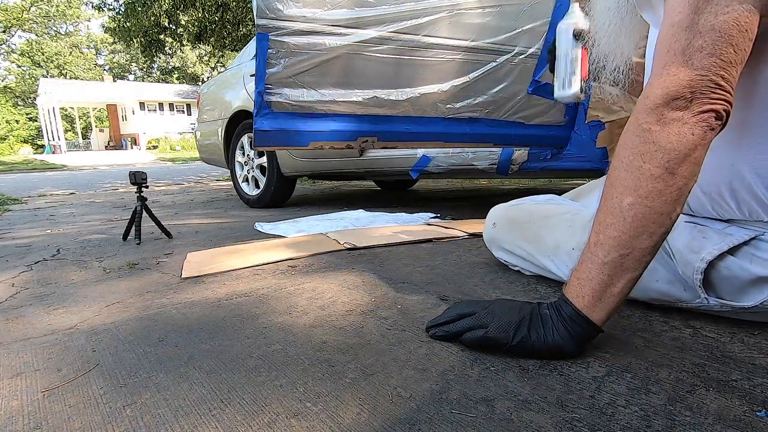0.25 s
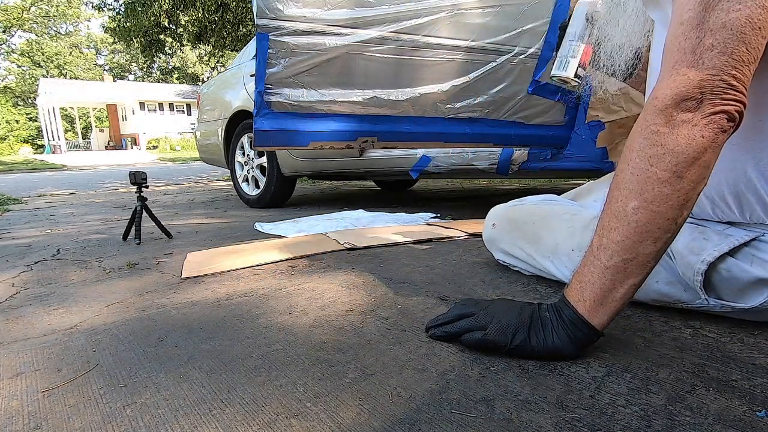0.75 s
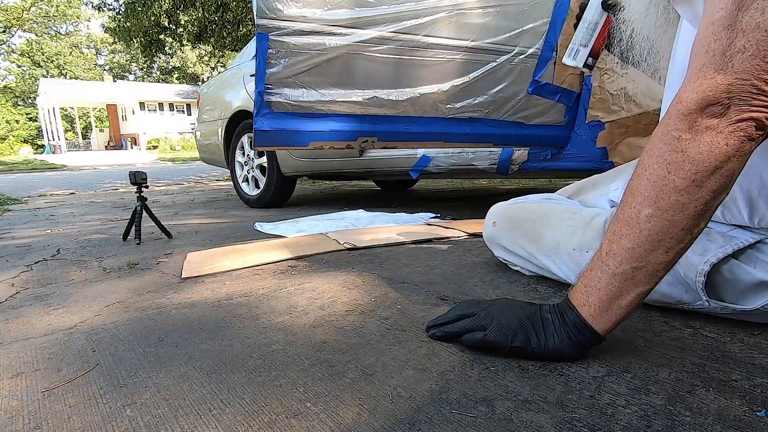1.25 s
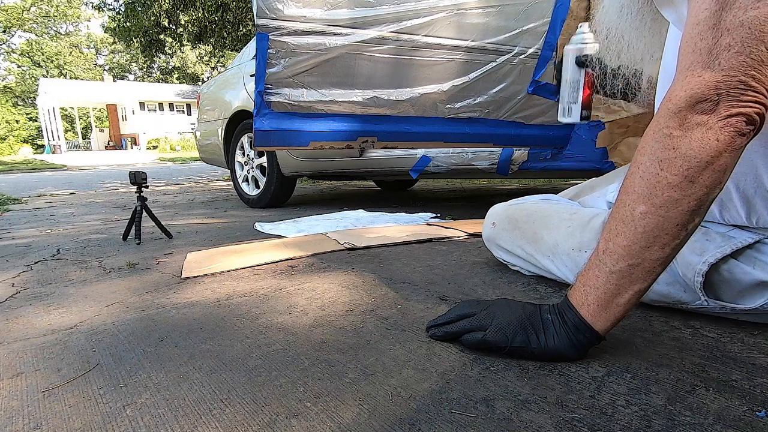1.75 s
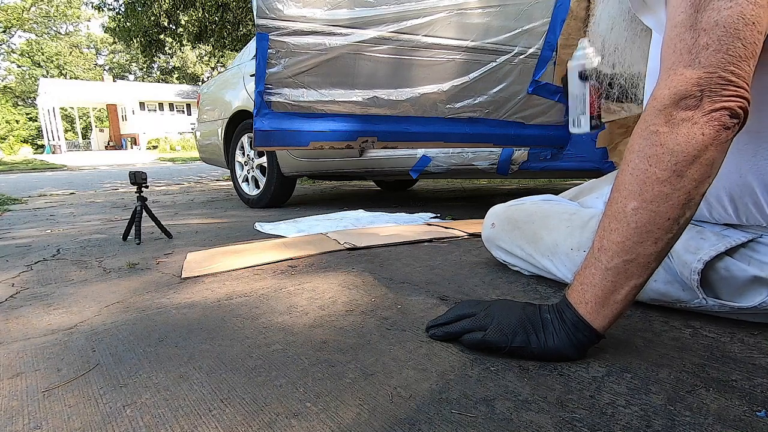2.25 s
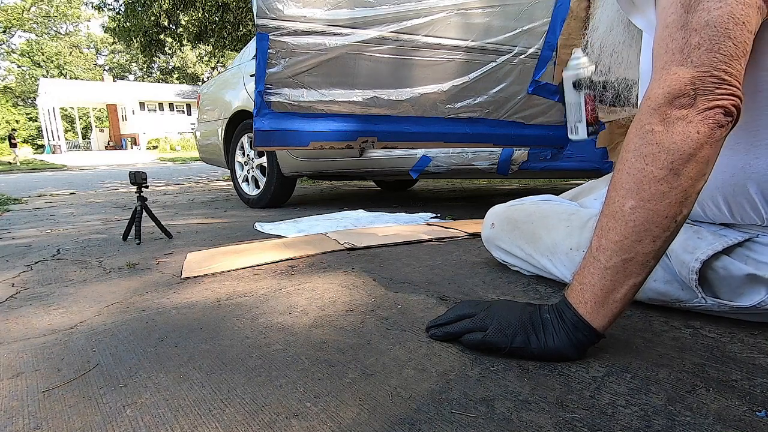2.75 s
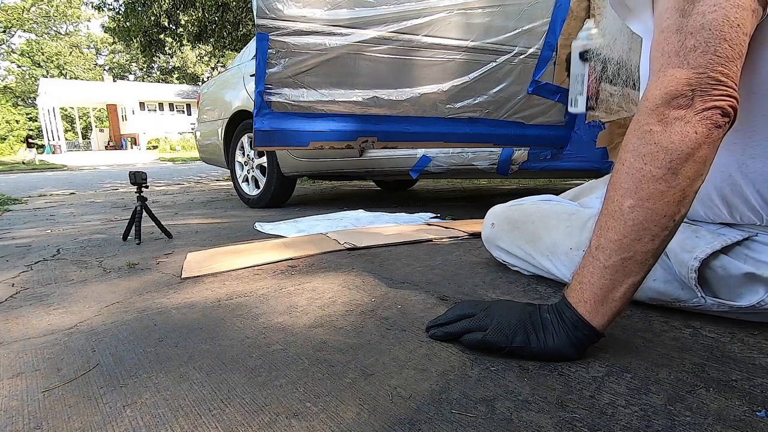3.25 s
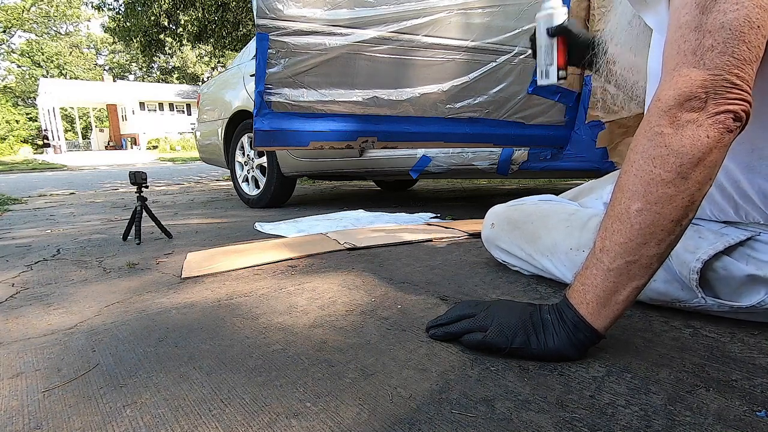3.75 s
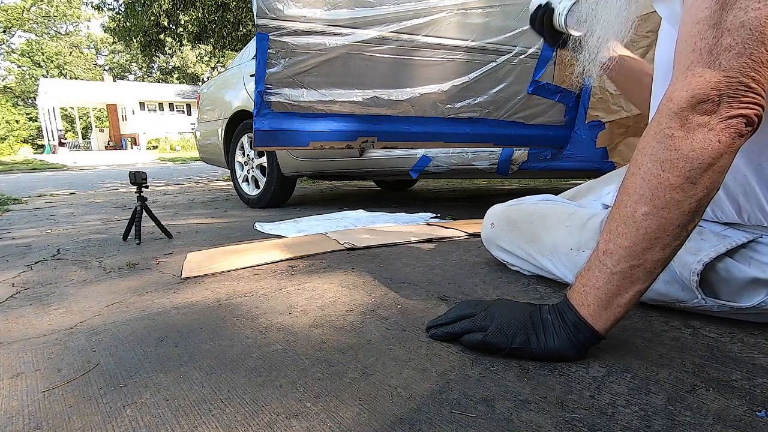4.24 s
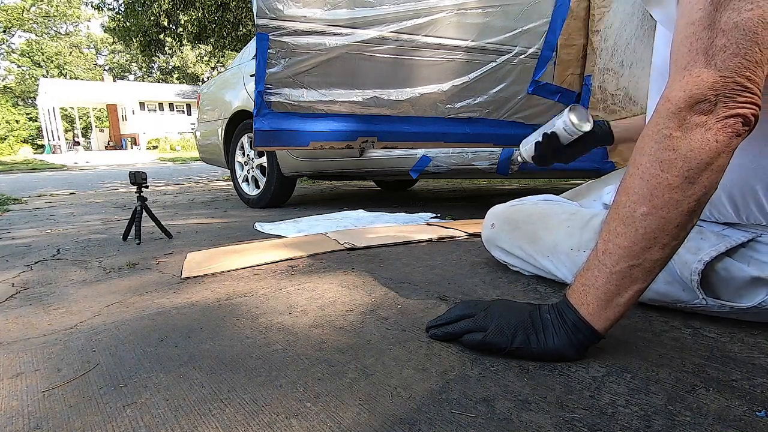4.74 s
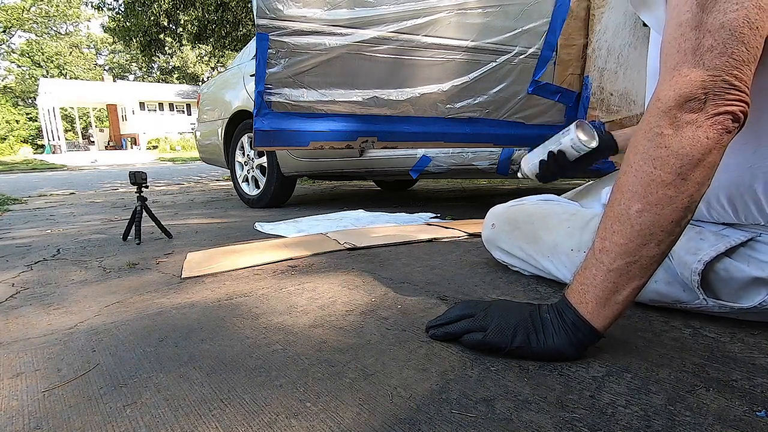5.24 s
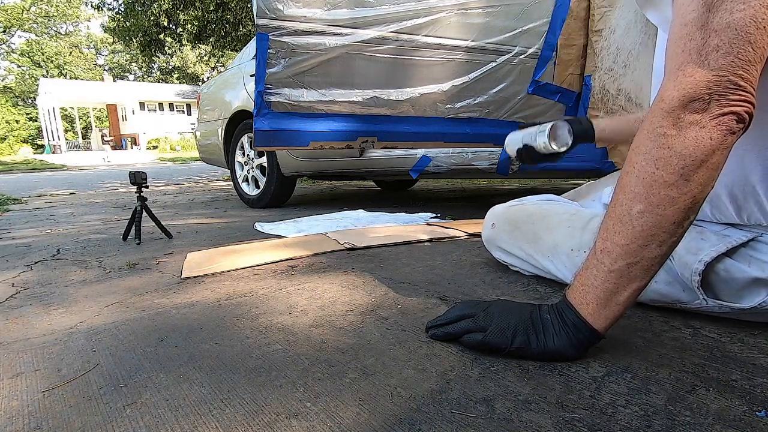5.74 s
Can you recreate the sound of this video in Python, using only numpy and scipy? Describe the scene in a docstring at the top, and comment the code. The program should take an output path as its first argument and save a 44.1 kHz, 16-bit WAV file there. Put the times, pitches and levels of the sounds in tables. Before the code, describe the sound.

A mixing ball clacks rapidly inside a hard-shaken spray paint can outdoors, then slows to single knocks over a faint low rumble.

```python
"""A spray paint can is shaken hard on a driveway beside a parked car, over a low rumble and a distant motor.
At first the mixing ball clacks fast against the ends of the can and knocks and skitters along its wall.
Paint and hand damp the steel; ground and car throw each clack back at once, a house later.
A soft hiss comes early, with faint squeaks in time with the strokes of the arm.
Before 4 s the shaking thins to single clacks, with squeaks again and three faint airy whistles."""
import sys
import numpy as np
from scipy import signal
from scipy.fft import rfft, irfft, next_fast_len
from scipy.io import wavfile
from scipy.ndimage import uniform_filter1d

SR = 44100
rng = np.random.default_rng(int(sys.argv[2]) if len(sys.argv) > 2 else 0)


def to_wav(s):
    """Save 16-bit WAV."""
    ch = np.atleast_2d(s).T  # columns
    pcm = np.round(np.clip(ch, -1, 1) * 32767)  # PCM
    wavfile.write(sys.argv[1], SR, pcm.astype(np.int16))


N = 264291  # length in samples


def amp(db):
    """Decibels to gain."""
    return 10 ** (np.asarray(db) / 20)


def unit(x):
    """Scales to an rms of one."""
    return x / np.sqrt(np.mean(x ** 2) + 1e-20)


def read(points, hz):
    """Reads a spectrum table on a log-frequency axis."""
    f, value = np.transpose(points)
    return np.interp(np.log(hz + 1), np.log(f + 1), value)


def curve(points):
    """Reads a time curve at every sample."""
    return np.interp(np.arange(N) / SR, *np.transpose(points))


def add(mix, s, sound):
    """Adds a stereo sound into the mix at time s."""
    part = mix[:, max(round(s * SR), 0):][:, :sound.shape[1]]
    part += sound[:, :part.shape[1]]


def bins(size):
    """Frequencies of a spectrum of size samples."""
    return np.fft.rfftfreq(size, 1 / SR)


def causal(db):
    """The causal (minimum-phase) filter that has this gain."""
    log_gain = np.log(amp(np.r_[db, db[-2:0:-1]]))
    return np.exp(np.conj(signal.hilbert(log_gain)))[:len(db)]


def pair(a, b, likeness):
    """Two spectra, as alike as asked, from two unrelated ones."""
    c = np.clip(likeness, 0, 1)
    return np.array([a, c * a + np.sqrt(1 - c ** 2) * b])


def noise(colour, likeness):
    """Stereo noise of rms one with a given spectrum (Hz, dB) and left-right likeness (Hz, 0-1)."""
    size = next_fast_len(N, True)
    hz = bins(size)
    a, b = rfft(rng.standard_normal((2, size)))
    coloured = pair(a, b, read(likeness, hz)) * amp(read(colour, hz))
    return unit(irfft(coloured, size)[:, :N])


def can(focus, ring_shift_db):
    """All blows of the ball on the ends and the wall, as the can radiates them in one direction."""
    return clacks(focus, ring_shift_db) + tocks(focus, ring_shift_db)


# The ball hits an end of the can. Levels are over 10 ms before the trim; the ring is set against
# the first knock, before the shift for direction.
# Columns: start_s [s], level_db [dB], pitch_hz [Hz], bright_db [dB], crack_sharp_db [dB], ring_db [dB]
END_CLACKS = [(0.0753, -26.5, 3140, 7, -1, 0), (0.1859, -31, 3130, 3.5, 0, 1),
              (0.3164, -25.0, 2730, 3, 4, 3), (0.3284, -30.0, 2990, 5.5, 1, 1),
              (0.71, -30.5, 3020, 1.5, 3, -3), (0.842, -23.5, 3280, 6.5, 3, -4),
              (0.8499, -26.5, 2900, 1.5, 3, 1), (0.9808, -26.0, 2930, -2, -2, 2),
              (1.1269, -36.5, 3000, 4, -10, -9), (1.1306, -24.0, 3480, 6, 1, 2),
              (1.1429, -36, 2690, 7, 1, 2), (1.2376, -29.0, 1720, 1, 5, 3), (1.3575, -24.0, 3190, 6, 2, 1),
              (1.379, -32.5, 3470, 7, -2, 2), (1.473, -27.5, 3000, -0.5, 0, 1),
              (1.6091, -23.5, 3500, 9.5, -1, -2), (1.6421, -30.0, 3380, 6, 0, -1),
              (1.7676, -28.5, 3100, 5, 2, 0.5), (1.9235, -30.0, 3200, 5.5, -3, -3),
              (1.9488, -28.5, 3170, 8.5, -3, -3), (2.0465, -30, 3350, 3.5, 0, -1),
              (2.1762, -25.5, 3000, 5, -1, 0), (2.2823, -29.0, 3400, 1.5, -2, 2),
              (2.4108, -24.0, 2950, 8, 3, 1), (2.4465, -31.0, 3340, 2, 2, -1),
              (2.4592, -39.0, 2970, 5, -1, 7), (2.5434, -28.5, 2950, 1, -3, 5),
              (2.6805, -28.5, 3100, 7, 0, -1), (2.8096, -30.5, 3080, 4.5, -3, -1),
              (2.9267, -28.0, 3140, 9.5, -1, 3), (3.032, -29.0, 3080, 3, -2, 4),
              (3.1616, -25.5, 3140, 8, 2, 1), (3.2595, -29.0, 3100, -0.5, 3, 4),
              (3.3987, -25.5, 3470, 7.5, 1, 2), (3.4505, -31.5, 3060, 7, -2, -1),
              (3.4627, -31.0, 3040, 9, 0, -2), (3.5494, -29.5, 3300, 2.5, 1, -1),
              (3.6941, -25.5, 3810, 3, 4, 3), (3.8419, -42.0, 2960, 2.5, 1, 3),
              (4.1747, -43.5, 3400, 4.5, -1, 4), (4.522, -25.5, 3100, 9.5, -2, 1),
              (4.538, -28.5, 2950, 5, 0, 0), (4.7475, -29.0, 2990, 7.5, -2, 3),
              (5.0152, -24.0, 2820, 8, -3, -3.5), (5.271, -25.5, 2990, 11.5, -4, -8.5),
              (5.5134, -28.5, 3190, 11, -1, -5), (5.5425, -45.5, 2800, 5, 1, 0),
              (5.955, -29.0, 3470, 8, -1, 2.5)]


def clacks(focus, ring_shift_db, trim_db=-.1):
    """The ball strikes the ends head-on: bright clacks with a crack and a short ring."""
    out = np.zeros((2, N))
    for start_s, level_db, pitch_hz, bright_db, sharp_db, ring_db in END_CLACKS:
        strengths_db = registers(level_db + trim_db, bright_db, sharp_db)
        add(out, start_s, blow(pitch_hz, ring_db + ring_shift_db, strengths_db, focus))
    return out


# The ball glances off the side wall. Levels are over 10 ms before the trim.
# Columns: start_s [s], level_db [dB], pitch_hz [Hz], bright_db [dB]
WALL_TOCKS = [(0.1322, -37.5, 1660, -9), (0.175, -39.5, 1570, -12), (0.2548, -40.0, 1610, -9),
              (0.3954, -34.5, 2110, -6), (0.4243, -45.5, 1610, -8), (0.445, -38.0, 1860, -10),
              (0.6134, -45.5, 2180, -10), (0.6848, -37.5, 1770, -4), (0.7472, -34.5, 1530, -14),
              (0.932, -38.5, 1640, -9), (1.035, -42.0, 1850, -9), (1.06, -43.5, 1590, -8),
              (1.183, -42.0, 1850, -7), (1.3512, -40.5, 1720, -4), (1.3962, -42, 1590, -6),
              (1.4299, -42.0, 1570, -7), (1.682, -39.0, 2540, 4), (1.839, -39.0, 2090, -9),
              (1.9045, -36.5, 2090, -7), (1.9591, -33.5, 1810, 2), (1.9771, -37.0, 1790, -5),
              (2.003, -40.5, 1720, -8), (2.0918, -34.5, 1740, -11), (2.1308, -40.5, 1810, -10),
              (2.2052, -36.5, 1810, -3), (2.2258, -39.5, 1810, -7), (2.3194, -38.0, 1380, -8),
              (2.341, -36.5, 1740, -10), (2.362, -42.0, 1830, -15), (2.3966, -42.5, 1810, -12),
              (2.4698, -42.0, 1810, -6), (2.5954, -36.5, 1420, -10), (2.6155, -42.5, 1510, -10),
              (2.7008, -39.0, 2300, -2), (2.7132, -40.0, 1940, -2), (2.8418, -39.0, 1830, -11),
              (2.8573, -42.0, 1740, -11), (2.948, -36.0, 1870, -4), (3.0653, -36.0, 1890, -17),
              (3.1021, -42.5, 1830, -13), (3.1963, -34.5, 1580, -2), (3.2214, -40.0, 1640, -8),
              (3.336, -40, 1960, -9), (3.4294, -39.5, 1660, 2), (3.474, -37.0, 2020, -3),
              (3.4993, -41.0, 1660, -1), (3.5202, -39.5, 1890, -12), (3.5355, -42.5, 1640, -12),
              (3.6074, -37.5, 1690, -10), (3.6704, -40.5, 1810, -2), (3.734, -33.5, 1700, -10),
              (3.7605, -36.0, 1590, -9), (3.7912, -37.5, 1980, -8), (3.9476, -40.5, 2520, 3),
              (4.0562, -32.0, 1610, -8), (4.1094, -45.5, 1440, -1), (4.134, -46.5, 1720, -7),
              (4.2962, -45.0, 1980, -5), (4.4607, -38.5, 2450, 0), (4.7275, -46.0, 1700, -7),
              (4.7832, -36.0, 2540, 7), (4.91, -44.5, 1960, 0), (5.2407, -45.5, 1890, -5),
              (5.561, -47.0, 2000, -1), (5.7701, -45.5, 1890, -3), (5.7844, -45.0, 1720, -3),
              (5.794, -45.5, 2020, -7), (5.9439, -44, 2110, -9), (5.9886, -31.5, 1890, -1)]
TOCK_RING_DB, TOCK_SHARP_DB = 4.3, 0.3  # a glancing blow rings on; ring before the shift for direction


def tocks(focus, ring_shift_db, trim_db=-.3):
    """The ball glances off the side wall: hollow tocks that ring on."""
    out = np.zeros((2, N))
    for start_s, level_db, pitch_hz, bright_db in WALL_TOCKS:
        strengths_db = registers(level_db + trim_db, bright_db, TOCK_SHARP_DB)
        add(out, start_s, blow(pitch_hz, TOCK_RING_DB + ring_shift_db, strengths_db, focus))
    return out


# how a blow's energy is shared among the registers (dB, and dB per dB of force or brightness)
BODY_DB, HOLLOW_DB, CRACK_DB = -1.1, -7, -10.3
HOLLOW_PER_FORCE, CRACK_PER_BRIGHT = -.25, .34
MIDDLING_DB = -35  # level of a middling blow


def registers(level_db, bright_db, sharp_db):
    """Levels of hollow, body, bright ring and crack: brightness lifts energy, a hard blow is less hollow."""
    body_db = level_db + BODY_DB - 10 * np.log10(1 + amp(bright_db) ** 2)
    hollow_db = body_db + HOLLOW_DB + HOLLOW_PER_FORCE * (level_db - MIDDLING_DB)
    crack_db = level_db + CRACK_DB + CRACK_PER_BRIGHT * bright_db + sharp_db
    return np.array([hollow_db, body_db, body_db + bright_db, crack_db])


# Borders of the can's four registers. Column: edge_hz [Hz]
REGISTER_BORDERS = [700, 1500, 2400, 4200, 12000]
# How alike left and right hear a knock. Columns: freq_hz [Hz], likeness [0-1]
KNOCK_LIKENESS = [(500, 0.94), (1000, 0.83), (2000, 0.99), (3500, 0.97), (5000, 0.88), (7800, 0.85),
                  (9500, 0.48), (12000, .2)]
# Near reflections from ground, body and car; each delay is varied per blow.
# Columns: delay_s [s], gain [linear]
NEAR_REFLECTIONS = [(.0022, 0.24), (.0034, 0.21), (.0071, 0.14)]


def blow(pitch_hz, ring_db, register_db, focus, low_cut_hz=700, size=2048):
    """One blow with its near reflections; its force and place set the strength of the four registers."""
    hz, edges = bins(size), np.array(REGISTER_BORDERS)
    left_knock = knock(pitch_hz, ring_db, focus, size)
    other_knock = knock(pitch_hz, ring_db, focus, size)
    z = pair(left_knock, other_knock, read(KNOCK_LIKENESS, hz))
    reflections = 1  # the direct sound
    for delay_s, gain in NEAR_REFLECTIONS:
        reflections = reflections + gain * np.exp(-2j * np.pi * hz * delay_s * rng.uniform(.88, 1.12))
    # so small a can radiates little bass
    low_cut_db = -10 * np.log10(1 + (low_cut_hz / (hz + 100)) ** 4)
    z = z * reflections * causal(low_cut_db)
    centres, register = np.sqrt(edges[1:] * edges[:-1]), np.digitize(hz, edges)
    for _ in range(2):  # the registers overlap, so a second pass brings them nearer their levels
        energy = np.bincount(register, (abs(z) ** 2).mean(0))[1:-1] * 2 / size
        power = energy / (SR / 100)  # mean over 10 ms
        z = z * causal(read(np.c_[centres, register_db - 10 * np.log10(power)], hz))
    fade_out = np.minimum(np.linspace(2, 0, size), 1)
    return irfft(z) * fade_out


# Modes of the can, before each blow's detuning and weighting.
# Columns: freq_hz [Hz], level_db [dB], t60_s [s]
CAN_MODES = [(1038, -8, 0.021), (1310, -4.5, 0.026), (1604, -4, 0.03), (1850, -0.5, 0.027), (2138, 3, .022),
             (2463, 1.5, 0.022), (2780, -0.5, 0.022), (3028, 3, 0.025), (3254, 3.5, 0.02),
             (3546, 2.5, 0.018), (3956, -3.5, 0.024), (4450, -5.5, 0.019), (4950, -12, 0.013),
             (5740, -3, 0.014), (6310, -7.5, 0.018), (6930, -13, 0.016), (7410, -12.5, 0.016),
             (8100, -21, 0.018), (9000, -14.5, 0.017), (9930, -14.5, 0.021)]
# Colour of the crack of contact. Columns: freq_hz [Hz], level_db [dB]
CRACK_COLOUR = [(200, -30), (650, -18.5), (1500, -3), (3200, 1.5), (5000, -3), (7200, -3), (8600, -15),
                (10200, -19), (11200, -28.5), (13500, -28.5), (16000, -41)]


def knock(pitch_hz, ring_db, focus, size, knock_s=0.00025, crack_s=0.00046, crack_db=-5, modes_db=-2,
          chatter_db=-9, chatter_s=0.0024):
    """Spectrum of one contact: the steel dents and springs back, the ball chatters, the modes ring briefly."""
    t = np.arange(size) / SR
    dent_envelope = (t / knock_s) ** 2 * np.exp(-t / knock_s)
    dent = dent_envelope * np.sin(2 * np.pi * (pitch_hz * t + rng.random()))
    # a glancing blow keeps the ball on the wall for longer
    contact = np.exp(-t / crack_s) + amp(chatter_db + ring_db) * np.exp(-t / chatter_s)
    contact = contact * (1 - np.exp(-t / 0.00026)) * rng.standard_normal(size)
    crack = irfft(rfft(contact) * causal(read(CRACK_COLOUR, bins(size))))
    hz, db, t60 = np.transpose(CAN_MODES)[:, :, None]
    weight, detune, phase = rng.standard_normal((3, len(CAN_MODES), 1))
    # the spot that is struck favours some modes, and the sloshing paint detunes them all
    near_pitch = np.exp(-(np.log(hz / pitch_hz) / 0.098) ** 2)
    weight = amp(db + 2.4 * weight) * (1 + focus * near_pitch)
    waves = np.sin(2 * np.pi * (hz * (1 + .025 * detune) * t + phase))
    ring = (weight * amp(-60 * t / t60) * waves).sum(0)
    ring *= (1 - np.exp(-t / 0.00033)) ** 2  # soft onset
    return rfft(unit(dent) + amp(crack_db + ring_db / 2) * unit(crack) + amp(ring_db + modes_db) * unit(ring))


# Level of the skittering ball, before the trim and the wall contact. Columns: time_s [s], level_db [dB]
SKITTER_LEVEL = [(0.0, -55), (0.33, -57), (0.62, -65), (1.08, -54), (1.38, -56), (1.93, -57.5),
                 (2.1, -46.5), (2.4, -49), (2.67, -55), (2.82, -53.5), (3.09, -48), (3.52, -54),
                 (3.62, -49), (3.79, -62), (3.9, -70), (4.3, -63.5), (4.74, -69.5), (5.99, -63)]


def skitter(per_s=120, spread_db=5.5, trim_db=-3.2, count=12):
    """All along, the ball grazes the wall in many tiny, dull ticks of random strength."""
    out = np.zeros((2, N))
    for _ in range(count):
        tick = blow(rng.uniform(1200, 2200), 6, np.array([-3, -1.5, -8.5, -11.5]), 1)
        strength = amp(spread_db * np.minimum(rng.exponential(1, N), 2))
        grazes = (rng.random(N) < per_s / count / SR) * strength
        out += signal.oaconvolve(grazes[None], tick, axes=1)[:, :N]
    return unit(out) * amp(curve(SKITTER_LEVEL) + trim_db) * wall_contact()


def wall_contact(flight_s=.03, flight_db=-2.5, settle_s=.05, settle_db=4):
    """Gain of the skitter: the ball flies free just before a clack, and chatters on the wall after it."""
    t = np.arange(N) / SR
    clack_s = np.r_[-1, np.sort([row[0] for row in END_CLACKS]), N / SR + 1]
    coming = np.searchsorted(clack_s, t)
    before, after = clack_s[coming] - t, t - clack_s[coming - 1]
    return amp(flight_db * np.exp(-(before / flight_s) ** 2) + settle_db * np.exp(-after / settle_s))


# A soft hiss and three faint airy whistles.
# Columns: start_s [s], length_s [s], centre_hz [Hz], width_hz [Hz], level_db [dB]
HISS_AND_WHISTLES = [(0.518, 0.093, 6800, 3000, -61.5), (4.06, 0.088, 4500, 220, -66),
                     (4.169, 0.23, 2150, 400, -59), (4.944, .085, 4550, 240, -64)]
# Runs of faint squeaks in time with the strokes of the arm.
# Columns: from_s [s], until_s [s], interval_s [s], level_db [dB]
SQUEAKS = [(.5, 1.6, 0.13, -54.5), (3.867, 4.06, 0.13, -57), (4.429, 5.95, .243, -59)]
SQUEAK_S, SQUEAK_HZ, SQUEAK_WIDTH_HZ = .026, 3260, 370


def swishes():
    """The few soft hisses and whistles, and the squeak that repeats with the strokes: bands of noise."""
    out = np.zeros((2, N))
    for start_s, length_s, hz, width_hz, level_db in HISS_AND_WHISTLES:
        add(out, start_s, swish(length_s, hz, width_hz, level_db))
    for from_s, until_s, interval_s, level_db in SQUEAKS:
        for start_s in np.arange(from_s, until_s, interval_s):
            add(out, start_s, swish(SQUEAK_S, SQUEAK_HZ, SQUEAK_WIDTH_HZ, level_db))
    return out


def swish(length_s, hz, width_hz, level_db, likeness=0.93):
    """A soft band of noise that swells and fades."""
    swell = signal.windows.tukey(round(length_s * SR), .7)
    z = pair(*rfft(rng.standard_normal((2, SR))), likeness)
    z = z / (1 + ((bins(SR) - hz) / width_hz) ** 4)
    return amp(level_db) * swell * unit(irfft(z))[:, :len(swell)]


# Later reflections from the car and the yard, before colouring.
# Columns: delay_s [s], level_db [dB], smear_s [s]
FAR_REFLECTIONS = [(.0095, -20.5, .003), (.021, -17, 0.0045), (.034, -28, .006), (.054, -26.5, .005),
                   (.136, -30.5, .006), (.157, -31, .012)]
# Colour of those reflections. Columns: freq_hz [Hz], level_db [dB]
REFLECTION_COLOUR = [(500, 1), (1500, 0.5), (3200, -1.5), (4500, -3), (7500, -3), (9500, 6), (14000, -2)]
# Decay of the open yard. Columns: freq_hz [Hz], t60_s [s]
TAIL_T60 = [(400, 0.1), (1500, 0), (3200, 0.08), (7000, 0.2), (14000, 0.08)]
# Colour of the open yard. Columns: freq_hz [Hz], level_db [dB]
TAIL_COLOUR = [(400, 4.5), (1500, 6), (3200, -4), (4500, 1), (7000, 0), (10000, 7.5), (14000, -7.5)]


def yard(x, tail_db=-18, likeness=0.58, rise_s=.0015, tail_from_s=0.016, count=5):
    """Smeared echoes and a thin tail of decaying noise; they change as the can moves about."""
    t, hz, out = np.arange(SR) / SR, bins(SR), np.zeros((2, N))
    place = rng.integers(0, count, N // 1024 + 1).repeat(1024)[:N]  # a random place every 1024 samples
    for k in range(count):
        scatter = irfft(pair(*rfft(rng.standard_normal((2, SR))), likeness))
        echoes = np.zeros((2, SR))
        for delay_s, db, smear_s in FAR_REFLECTIONS:
            envelope = np.exp(-np.maximum((t - delay_s) / smear_s, (delay_s - t) / rise_s))
            echoes += amp(db) * unit(scatter * envelope)
        echoes = irfft(rfft(echoes) * amp(read(REFLECTION_COLOUR, hz)))
        tail_noise = irfft(pair(*rfft(rng.standard_normal((2, SR))), likeness))
        f, age, z = signal.stft(tail_noise, SR, nperseg=256)
        z = z * amp(read(TAIL_COLOUR, f)[:, None] - 60 * age / read(TAIL_T60, f)[:, None])
        tail = unit(signal.istft(z, SR)[1][:, :SR] * np.minimum(t / tail_from_s, 1) ** 2)
        response = (echoes + amp(tail_db) * tail) / np.sqrt(SR)
        here = uniform_filter1d(1. * (place == k), size=64)  # brief crossfade between places
        out += signal.fftconvolve(x * here, response, axes=1)[:, :N]
    return out


# Phase between the sides. Columns: freq_hz [Hz], left_lead_rad [rad]
SIDE_PHASE = [(300, 0.95), (3600, 0), (5100, -0.5), (6500, 0.53), (7300, -0.06), (8700, 0.2), (9800, -3),
              (11500, -0.3)]
# Level between the sides. Columns: freq_hz [Hz], left_over_right_db [dB]
SIDE_BALANCE = [(300, -6), (1000, -3), (3000, -1.5), (5500, -1.3), (7300, 0), (10000, 0.5)]


def left_right(x):
    """Left and right differ in level and phase with frequency; each side takes half the difference."""
    size = next_fast_len(2 * N)
    hz = bins(size)
    lean = amp(read(SIDE_BALANCE, hz) / 2) * np.exp(.5j * read(SIDE_PHASE, hz))
    return irfft(rfft(x, size) * np.array([lean, 1 / lean]), size)[:, :N]


def background():
    """Outdoor air, a low uneven rumble and the wavering hum of a far motor, a touch louder on the right."""
    drift, swell = noise([(1, -0.5), (4, -6.5), (20, -29), (200, -120)], [(1, 0), (200, 0)])
    return (air() + rumble(swell) + motor(drift)) * amp([[-.35], [.35]])


# Relative spectrum of the outdoor air. Columns: freq_hz [Hz], density_db [dB per Hz]
AIR_COLOUR = [(20, -8), (100, -6.5), (400, -19), (750, -25), (1100, -24), (1600, -25.5), (2300, -29),
              (3400, -26.5), (5000, -36), (6800, -35), (8300, -39), (10200, -38), (11300, -59),
              (16000, -75)]
# How alike left and right hear air and rumble. Columns: freq_hz [Hz], likeness [0-1]
OUTDOOR_LIKENESS = [(30, 0.92), (120, .97), (300, 0.92), (600, 0.53), (1500, 0.23), (4000, 0.39),
                    (10000, 0.064)]


def air(level_db=-52.9):
    """Outdoor air: steady coloured noise, less alike on the two sides towards the treble."""
    return amp(level_db) * noise(AIR_COLOUR, OUTDOOR_LIKENESS)


# Relative spectrum of the rumble. Columns: freq_hz [Hz], density_db [dB per Hz]
RUMBLE_COLOUR = [(12, -33), (22, -18), (30, -3.5), (45, -6), (60, -1), (76, 1), (100, -4), (150, -9),
                 (220, -15), (320, -21.5), (480, -27), (700, -39.5), (1200, -58.5), (4000, -100)]
# Level of the rumble, before trim and swell. Columns: time_s [s], level_db [dB]
RUMBLE_COURSE = [(0.0, -49.0), (0.1, -41.5), (0.9, -45.0), (1.1, -42.5), (2.2, -44.5), (2.3, -49.0),
                 (2.4, -45.0), (3.0, -45.5), (3.3, -41.5), (3.9, -44.0), (4.1, -48.5), (4.4, -41.5),
                 (4.6, -47.5), (4.8, -43.5), (5.5, -46.5), (5.99, -43.5)]


def rumble(swell, trim_db=-.5, swell_db=1.3):
    """Low noise whose level follows a slow course and a random swell."""
    level_db = curve(RUMBLE_COURSE) + trim_db + swell_db * swell
    return amp(level_db) * noise(RUMBLE_COLOUR, OUTDOOR_LIKENESS)


# Partials of the distant motor, before the trim. Columns: speed_multiple [ratio], level_db [dB]
MOTOR_PARTIALS = [(2.04, -53), (3, -63.5), (4, -66), (5, -69.5), (6, -68.5), (7, -77.5), (8, -74), (9, -73),
                  (10, -83)]
MOTOR_HZ = 58.9  # mean speed


def motor(drift, trim_db=-1, waver=0.004):
    """A far motor hums in sine partials that all follow its wavering speed."""
    turns = np.cumsum(MOTOR_HZ * (1 + waver * drift)) / SR
    hum = 0
    for multiple, level_db in MOTOR_PARTIALS:
        hum = hum + amp(level_db + trim_db) * np.sin(2 * np.pi * (multiple * turns + rng.random()))
    return np.sqrt(2) * hum  # partial levels are rms


def scene():
    """The rattling can in the yard; sent out in all directions, its tone evens out in the echoes."""
    ticks = skitter()
    towards = can(focus=1.43, ring_shift_db=1.1) + ticks
    around = can(focus=.2, ring_shift_db=-4.5) + ticks
    return left_right(towards + yard(around)) + background() + swishes()


CUT_HZ = 16000


def record(dry):
    """Limits the band: a steep low-pass takes away the topmost treble."""
    low_pass = signal.firwin(255, CUT_HZ, window=("kaiser", 9), fs=SR)
    return signal.oaconvolve(dry, low_pass[None], "same")


dry = scene()
out = record(dry)
to_wav(out)
```